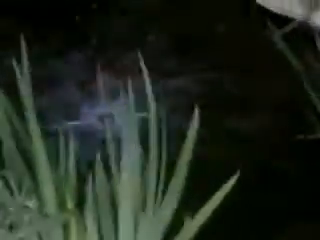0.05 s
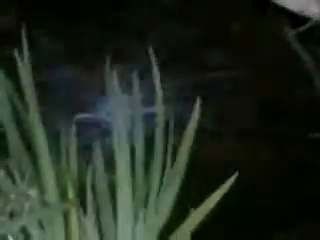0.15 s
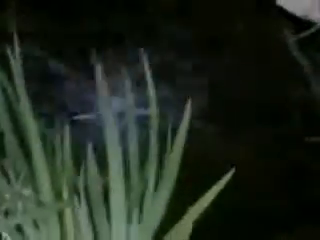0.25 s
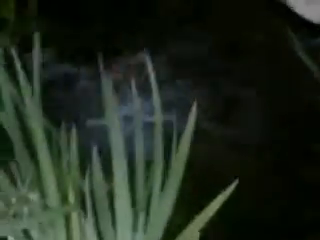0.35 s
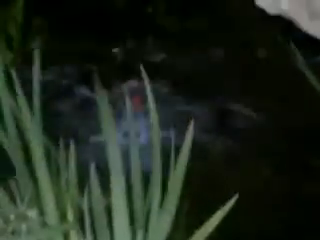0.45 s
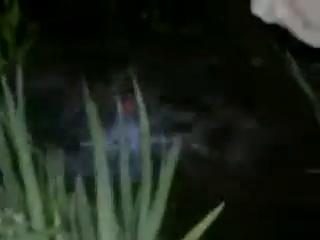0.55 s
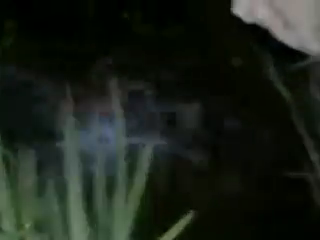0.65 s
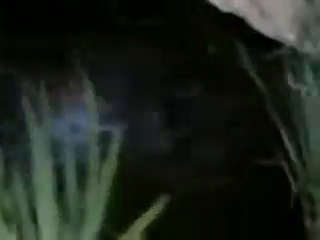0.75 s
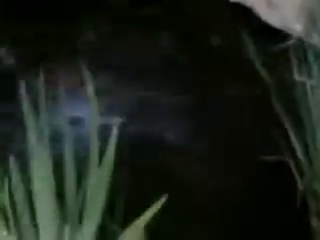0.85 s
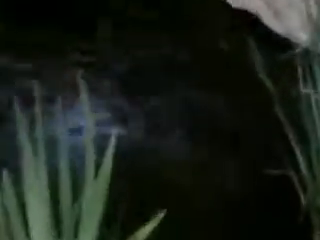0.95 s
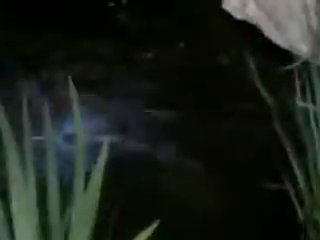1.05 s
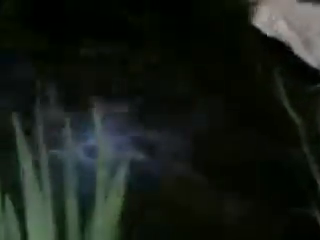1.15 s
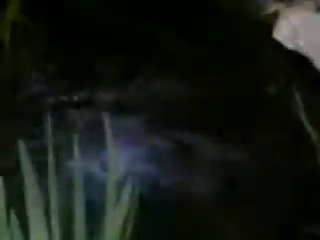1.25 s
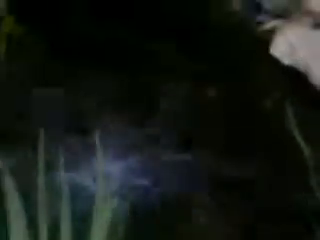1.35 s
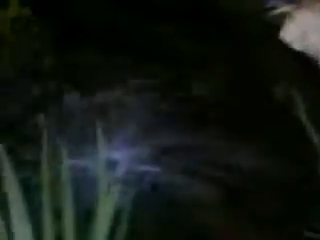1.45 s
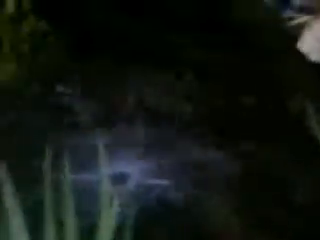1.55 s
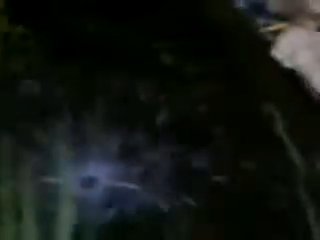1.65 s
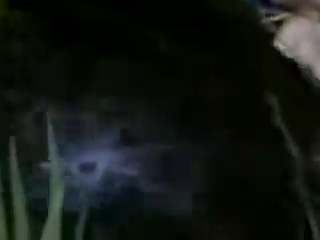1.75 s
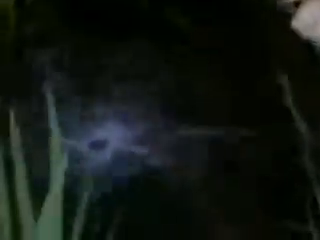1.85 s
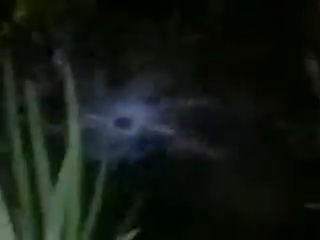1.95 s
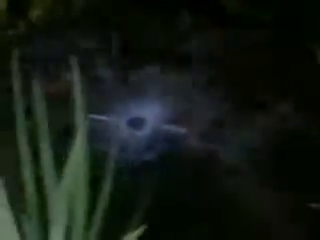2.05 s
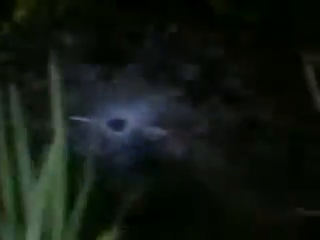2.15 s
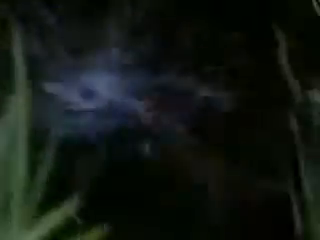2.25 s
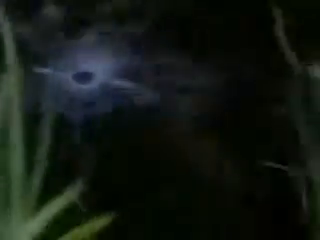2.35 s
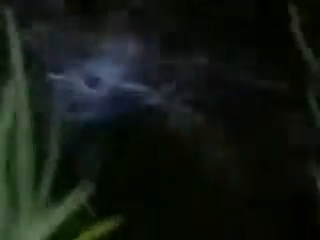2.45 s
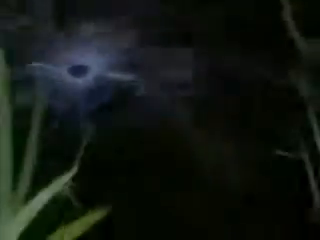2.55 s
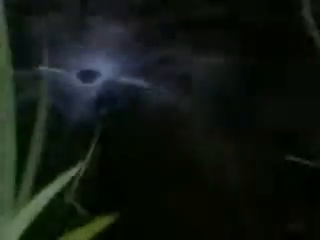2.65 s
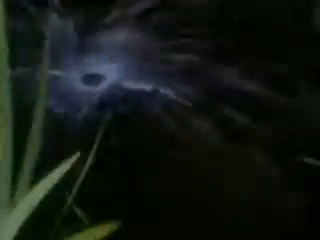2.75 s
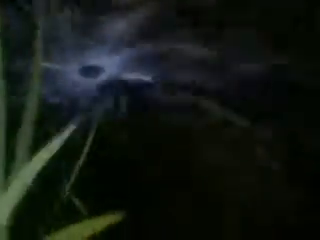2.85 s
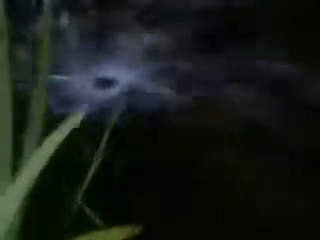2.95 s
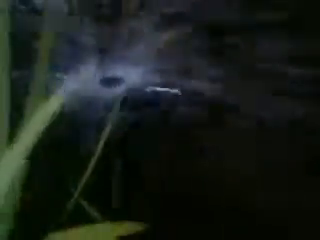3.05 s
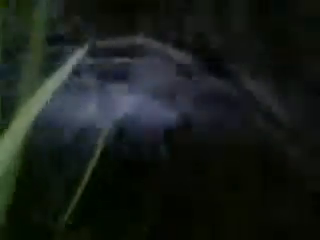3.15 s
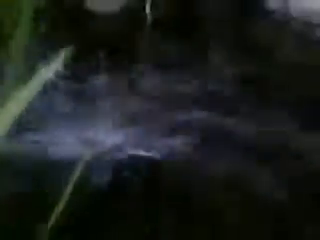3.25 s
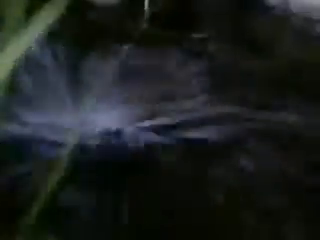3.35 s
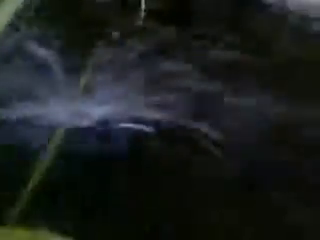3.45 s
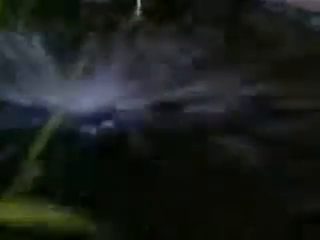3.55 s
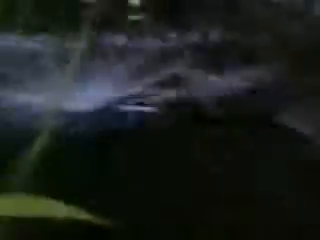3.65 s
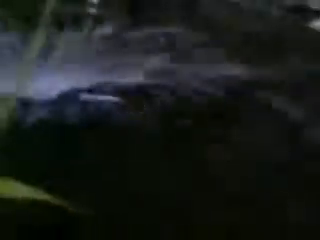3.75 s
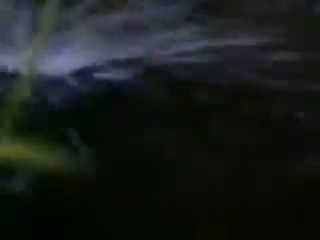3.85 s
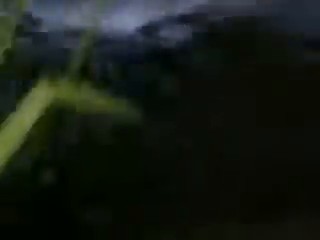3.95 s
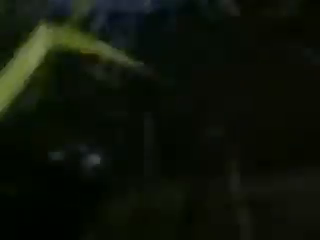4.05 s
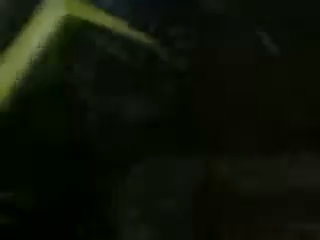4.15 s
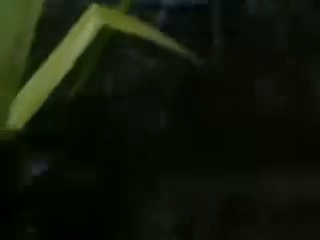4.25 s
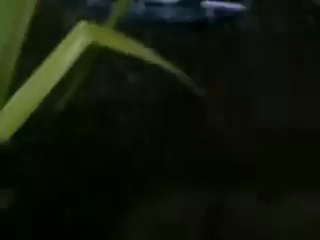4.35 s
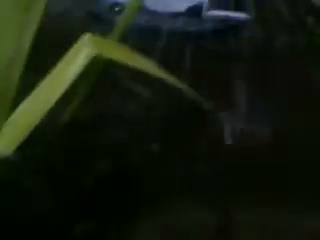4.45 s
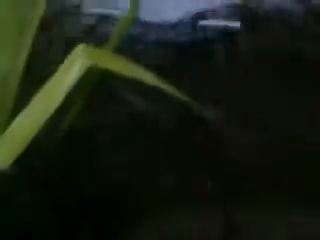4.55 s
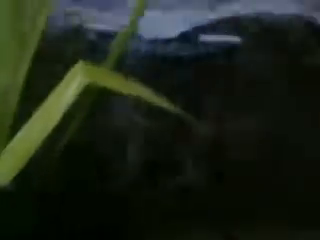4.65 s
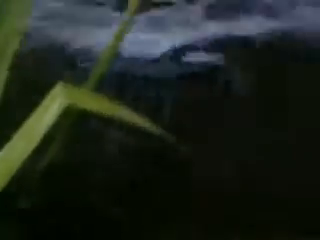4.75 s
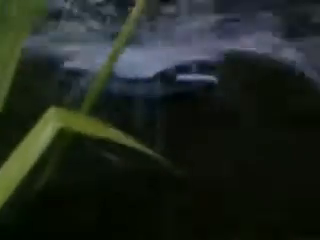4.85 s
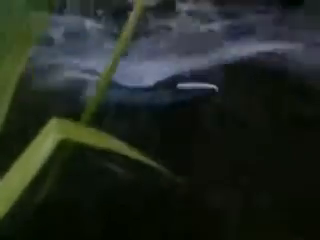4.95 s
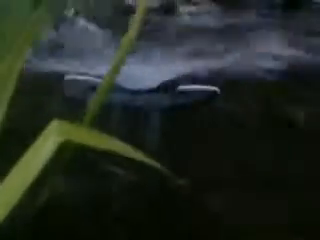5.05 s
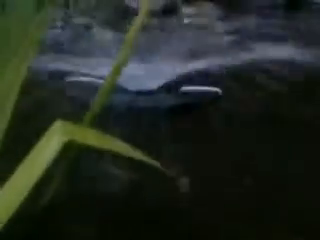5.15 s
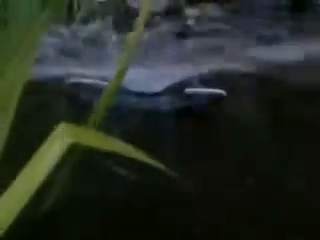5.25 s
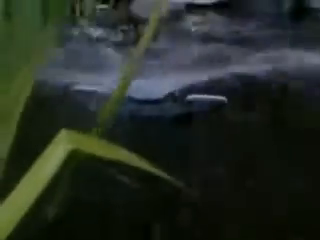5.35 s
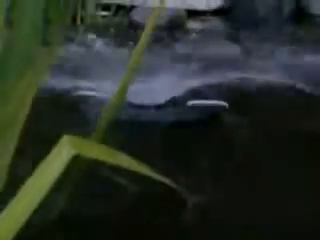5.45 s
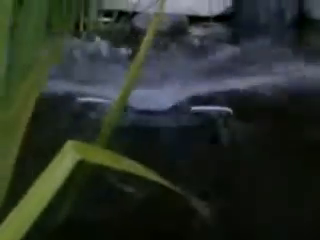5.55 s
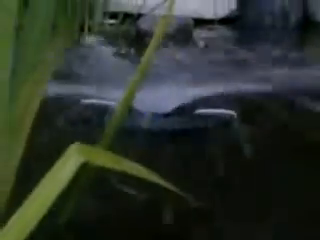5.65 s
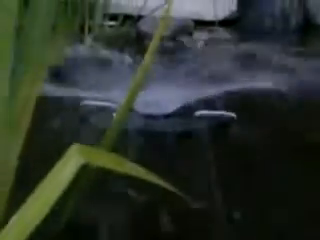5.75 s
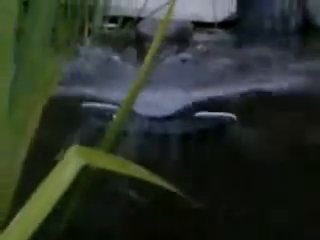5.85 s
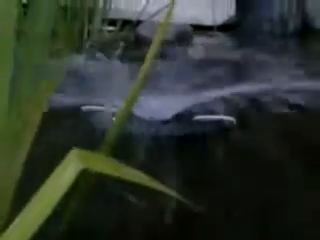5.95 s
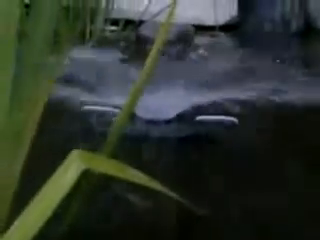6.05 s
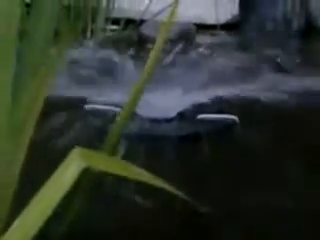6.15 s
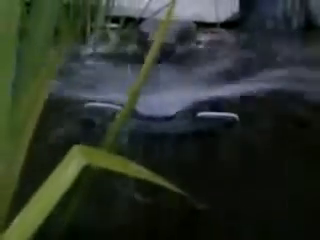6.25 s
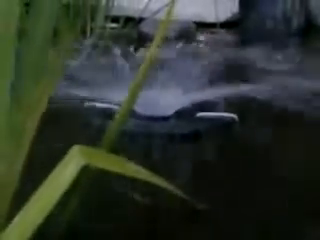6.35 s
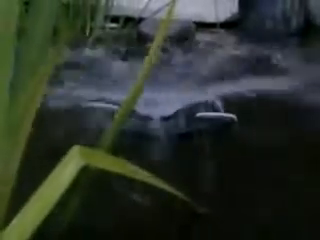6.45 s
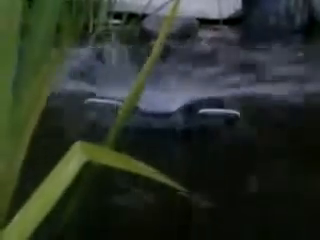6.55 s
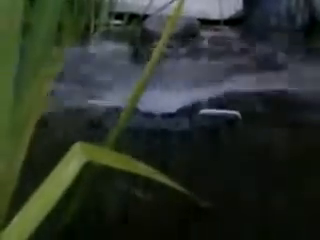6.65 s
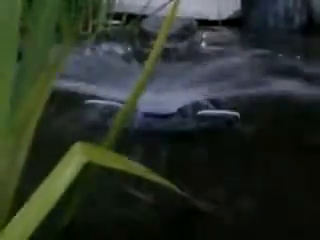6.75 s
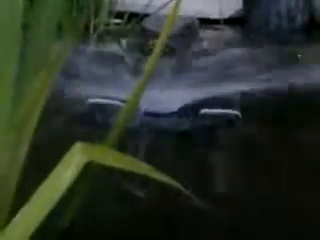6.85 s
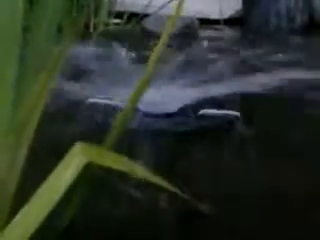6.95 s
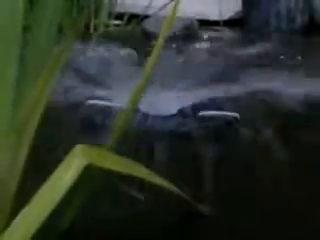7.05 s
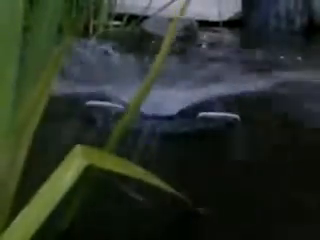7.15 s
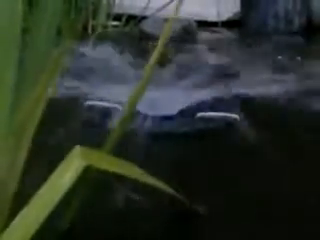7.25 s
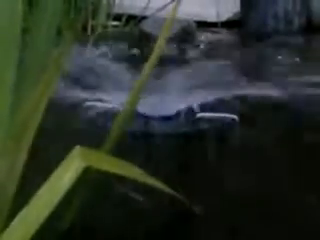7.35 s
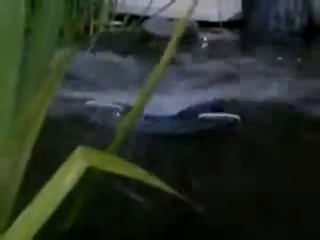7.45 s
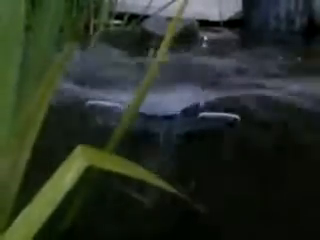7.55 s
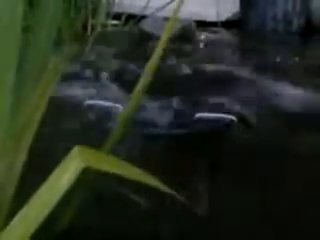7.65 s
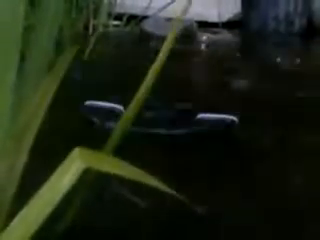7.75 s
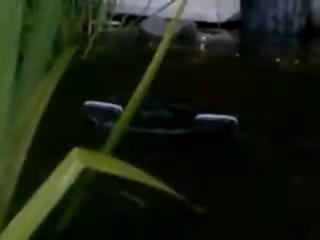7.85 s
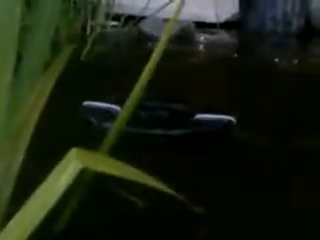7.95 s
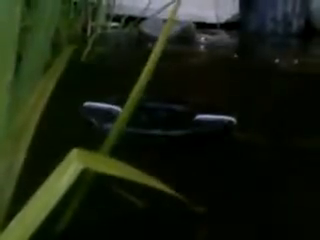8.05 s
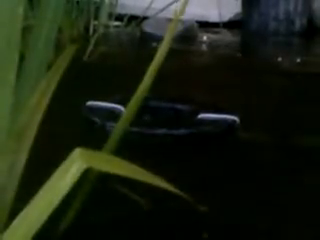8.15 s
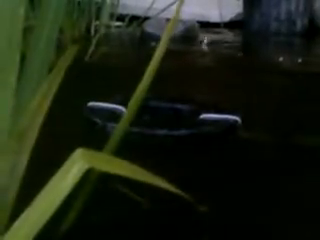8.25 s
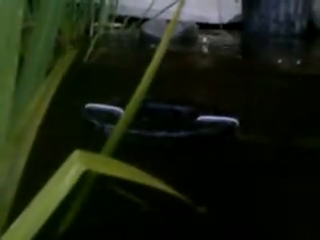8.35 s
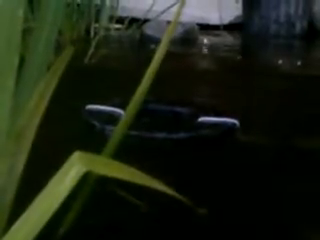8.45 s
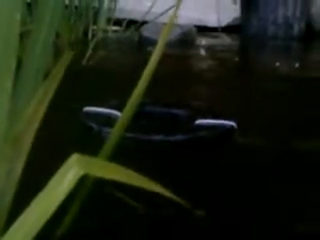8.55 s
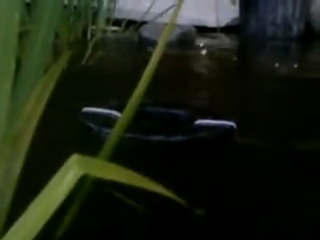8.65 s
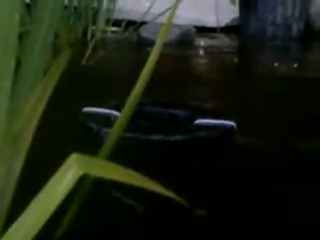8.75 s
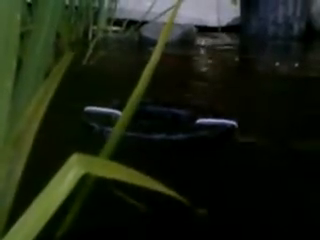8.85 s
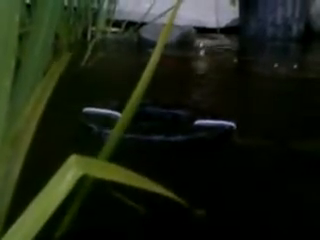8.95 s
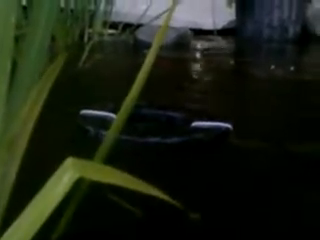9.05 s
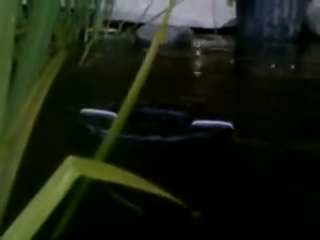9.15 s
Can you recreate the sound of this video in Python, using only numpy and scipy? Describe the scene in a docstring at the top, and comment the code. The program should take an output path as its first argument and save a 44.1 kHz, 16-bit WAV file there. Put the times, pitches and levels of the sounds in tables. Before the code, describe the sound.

Water sprays steadily from a floating fountain as wind thumps the microphone, until the pump cuts out and the last drops fall.

```python
"""A small floating pump flings a disc of spray over a garden pond while wind buffets the microphone.
Single drops splat and drip. The listener stoops from above the reeds to the water line, which changes
the balance of the resonances in the float's drone. The pump gulps air and stops at 7.65 s; the last
drops fall and water trickles off the float in ringing bubbles. A bird trills far off, and a soft band
of noise swells at the end."""
import sys
import numpy as np
from scipy import signal
from scipy.fft import rfft, irfft
from scipy.io import wavfile
from scipy.ndimage import map_coordinates

SR = 44100
rng = np.random.default_rng(int(sys.argv[2]) if len(sys.argv) > 2 else 0)


def master_out(mix):
    """Clip the mix to full scale and print it as 16-bit PCM to the path in sys.argv[1]."""
    frames = np.transpose(np.atleast_2d(mix))
    ceiling = np.clip(frames, -1, 1)
    pcm = np.round(ceiling * 32767).astype(np.int16)
    wavfile.write(sys.argv[1], SR, pcm)


N = 405279


def amp(db):
    """Amplitude ratio of a level in dB."""
    return 10 ** (np.asarray(db) / 20)

def unit_rms(x):
    """Normalisation to unit power."""
    return x / np.sqrt(np.mean(x ** 2) + 1e-20)

def in_time(rows):
    """Linear interpolation of each column at every sample."""
    s, *columns = np.transpose(rows)
    return [np.interp(np.arange(N) / SR, s, c) for c in columns]

def hold(start, length, edge):
    """Trapezoidal envelope, at half height at its start and end."""
    t = np.arange(N) / SR
    return np.clip(np.minimum(t - start, start + length - t) / edge + .5, 0, 1)

def add(out, s, sound):
    """Superposition of a short sound at time s."""
    i = round(s * SR)
    out[i:i + len(sound)] += sound[:N - i]

def drift(hz):
    """Random modulation: low-passed noise of unit rms."""
    r = np.exp(-80 * np.pi * hz / SR)
    slow = signal.lfilter([1], [1, -2 * r, r * r], rng.standard_normal(N // 40 + 2002))[2000:]
    return np.interp(np.arange(N) / 40, np.arange(len(slow)), unit_rms(slow))

def colour(x, spectrum):
    """Minimum-phase filter, from the folded cepstrum of a spectrum table."""
    size = 8192
    hz, level_db = np.transpose(spectrum)
    grid = np.maximum(np.fft.rfftfreq(size, 1 / SR), 1)
    cepstrum = irfft(np.interp(np.log(grid), np.log(hz), level_db) * np.log(10) / 20)
    cepstrum[1:size // 2] *= 2
    cepstrum[size // 2 + 1:] = 0
    return signal.fftconvolve(x, irfft(np.exp(rfft(cepstrum))))[:N]

def resonance(x, hz, width_hz):
    """Damped second-order resonator of unit peak gain."""
    r = np.exp(-np.pi * width_hz / SR)
    gain = (1 - r * r) / 2
    return signal.lfilter([gain, 0, -gain], [1, -2 * r * np.cos(2 * np.pi * hz / SR), r * r], x)


def droplets(per_s, spread_db, mist):
    """Shot noise: random impacts of uneven size over a Gaussian mist."""
    sizes = amp(spread_db * np.minimum(rng.exponential(1, N), 6)) * rng.choice([-1, 1], N)
    return unit_rms(sizes * (rng.random(N) < per_s / SR)) + mist * rng.standard_normal(N)

def bubbles(per_s, pitches_hz, q, spread_db, max_spreads):
    """Bubble resonance: pockets of air, trapped at random, each ring briefly at one of the pitches."""
    sizes = amp(spread_db * np.minimum(rng.exponential(1, N), max_spreads))
    kicks = sizes * (rng.random(N) < per_s / SR)
    choice = rng.integers(0, len(pitches_hz), N)
    rings = (resonance(kicks * (choice == k) + 1e-18, hz, hz / q) for k, hz in enumerate(pitches_hz))
    return unit_rms(sum(rings))

def splashes(per_s, t60):
    """Exponential relaxation: an envelope jumps as each larger blob lands, then decays."""
    jumps = rng.exponential(1, N) * (rng.random(N) < per_s / SR)
    return signal.lfilter([1], [1, -amp(-60 / (t60 * SR))], jumps + 1e-18)

# Course of the spray: t/s, level/dB, tilt of the lower hiss/dB
SPRAY_LEVELS = [(0, -28.5, 3.5), (.46, -28, 2.5), (.9, -25.5, -3), (1.33, -24.5, -1.5), (1.75, -25.5, -1),
                (2.9, -24, -2), (3.22, -23.5, -5), (3.68, -27.5, 0.5), (4.5, -28, 1), (6.5, -28, 1.5),
                (7.22, -27.5, -0.5), (7.6, -28, -0.5), (7.65, -31, 1), (7.68, -35, 4.5), (7.735, -40, 6.5),
                (7.78, -36.5, 3), (7.885, -38.5, 3), (7.91, -44.5, 2), (8.05, -45.5, 0), (8.6, -49.5, 7),
                (9.19, -48.5, 0)]
# Spectrum of the spray: f/Hz, density level/dB
SPRAY_SPECTRUM = [(250, -29), (400, -36), (900, -21), (2000, -18.5), (3800, -16), (4300, -14), (5400, -14),
                  (6500, -11.5), (7800, -6), (9400, -1.5), (10200, -5), (10700, -8), (12200, -15),
                  (15700, -21)]
def spray(surge_db, patchy_db):
    """Incoherent summation: impacts and bubbles merge in a hiss that surges as a whole and by band."""
    level_db, tilt_db = in_time(SPRAY_LEVELS)
    impacts = droplets(per_s=9000, spread_db=1.5, mist=1.74)
    ringing = bubbles(1500, np.geomspace(1500, 15000, 40), q=36, spread_db=6.9, max_spreads=5)
    rest = unit_rms(colour(impacts + .37 * ringing, SPRAY_SPECTRUM))
    envelope = amp(level_db + surge_db * drift(27))
    hiss = 0
    for hz in np.geomspace(900, 12500, 9):   # peel off bands from the bottom
        band = signal.sosfiltfilt(signal.butter(2, hz, fs=SR, output="sos"), rest)
        rest = rest - band
        lowness = np.clip(np.log2(7500 / hz), 0, 1)
        gain = amp(lowness * tilt_db + patchy_db * drift(1.9))
        hiss += band * gain * (1 + .097 * splashes(per_s=60, t60=.046))
    hiss += rest * amp(.2 * np.minimum(level_db + 42, 0))   # the last drops lack the finest mist
    return envelope * hiss * (1 + .015 * splashes(per_s=44, t60=.0075))

# Two near reflections that sweep as the listener moves: t/s, first lag/ms, second lag/ms, strength/1
NEAR_ECHOES = [(0, .41, .76, .7), (.25, .465, .73, .7), (.55, .47, .725, .6), (.8, .46, .72, 1),
               (1.0, .44, .68, .9), (1.25, .41, .62, .8), (1.55, .47, .7, .6), (1.75, .43, .5, .5),
               (2.1, .36, .5, .7), (2.45, .36, .55, .5), (2.9, .4, .6, 0), (9.19, .4, .6, 0)]
def reflections(x, bank_gain):
    """Comb filtering: echoes off small things nearby, stones and banks interfere with the direct hiss."""
    lag1_ms, lag2_ms, strength = in_time(NEAR_ECHOES)
    n = np.arange(N)
    treble = signal.butter(2, [3800, 11000], "band", fs=SR, output="sos")
    scattered = strength * signal.sosfiltfilt(treble, x)
    out = x.copy()
    for gain, lag_ms in ((.3, lag1_ms), (-.32, lag2_ms)):
        out += gain * map_coordinates(scattered, [n - lag_ms * SR / 1000], order=3)
    for bank_ms in (1.35, 2.4, 3.9, 6.1):
        lag_ms = bank_ms + .076 * drift(.64)
        out += bank_gain * np.interp(n - lag_ms * SR / 1000, n, x)
    return out

# Course of the drone: t/s, level/dB, stoop/1 (0 above, 1 at the water line)
DRONE = [(0, -46, 0.73), (.6, -37.5, 0.089), (1.7, -36, 0), (2.2, -36.5, 0.36), (2.6, -36.5, 0.21),
         (3, -33.5, 0.29), (3.3, -39, 0.81), (3.7, -35, 0.52), (4.25, -38, 0.88), (5, -38.5, 0.93),
         (7, -38.5, 0.88), (7.45, -35, 0.8), (9.19, -35, 1)]
# Modes of the float: f/Hz, nominal width/Hz, gain from above/dB, gain at the water line/dB
FLOAT_MODES = [(518, 112, -21, -2.5), (770, 57, -18.5, -8.5), (1102, 296, -15, -7.5), (1240, 114, -17, 3.5),
               (1425, 33, -12, -6), (1584, 276, -11.5, 0), (1961, 190, -12.5, -4), (2194, 79, -7.5, -9),
               (2484, 200, -9.5, -10.5), (2780, 120, -30, -4.5), (2935, 60, -55, 4)]
STOP_S = 7.65
def pump(waver_db, gulps_s, run_down_db_per_s):
    """Forced vibration: impeller slap and turbulence drive the float's modes until the pump runs down."""
    drone_db, stoop = in_time(DRONE)
    t = np.arange(N) / SR
    drone_db -= 7 * sum(np.exp(-((t - s) / .0092) ** 2) for s in gulps_s)   # the impeller draws air
    drone_db -= 15 * hold(STOP_S, np.inf, .0079) + run_down_db_per_s * np.maximum(t - STOP_S, 0)
    shake = droplets(per_s=3000, spread_db=3, mist=.98)
    modes = 0
    for k, (hz, width_hz, above_db, waterline_db) in enumerate(FLOAT_MODES):
        ring = resonance(resonance(shake, hz, 1.32 * width_hz), hz, 1.32 * width_hz)
        heard_db = above_db + stoop * (waterline_db - above_db)
        modes += (-1) ** k * amp(heard_db + waver_db * drift(17.4)) * ring
    return amp(drone_db + .4 * drift(22)) * unit_rms(modes)

# Hollow gliding band in the drone: t/s, f/Hz, level/dB
HOLLOW_SWEEP = [(0, 1342, -43), (1.5, 1320, -41), (2.45, 1202, -53), (2.6, 1400, -46), (2.9, 1318, -39),
                (3.35, 1240, -44.5), (3.5, 1440, -48), (3.8, 1360, -39.5), (4.3, 1223, -56),
                (4.5, 1230, -90), (9.19, 1230, -90)]
def hollow_sweep(width_hz):
    """Narrow-band noise: a hollow band in the drone sweeps near 1.3 kHz as the listener moves."""
    hz, level_db = in_time(HOLLOW_SWEEP)
    phase = 2 * np.pi * np.cumsum(hz) / SR
    lowpass = signal.butter(2, width_hz / 2, fs=SR, output="sos")
    slow = signal.sosfilt(lowpass, rng.standard_normal((2, N)))
    return amp(level_db) * unit_rms(slow[0] * np.cos(phase) + slow[1] * np.sin(phase))

# Spectrum of the wind's rumble: f/Hz, density level/dB
WIND_SPECTRUM = [(11, 11), (18, 8.5), (108, 4), (193, -13), (232, -11.5), (297, -23), (601, -27.5),
                 (700, -43), (910, -63), (1540, -120)]
# Gusts: t/s, duration/s, level/dB
WIND_GUSTS = [(0, 0.36, -27.5), (0.437, 0.62, -37.5), (1.437, 0.27, -47), (2.314, 0.88, -36.5),
              (3.453, 0.71, -45), (5.43, 0.23, -44), (5.964, 0.596, -31), (6.77, 0.61, -41.5),
              (7.447, 0.72, -41.5), (8.35, 0.45, -46)]
# Single buffets: t/s, nominal level/dB, nominal f/Hz
WIND_BUFFETS = [(0.095, -23, 113), (.108, -21, 90), (.143, -12, 110), (.147, -21, 333), (.152, -8, 102),
                (.184, -22.5, 135), (.262, -16.5, 140), (.271, -19, 302), (.555, -25, 99), (.752, -26, 60),
                (.865, -26, 60.6), (1.065, -27, 76), (1.755, -31.5, 50.4), (2.345, -26, 67),
                (2.392, -19.5, 129), (2.591, -25.5, 119), (2.63, -25, 80.5), (3.06, -21, 100),
                (3.114, -22, 131), (3.724, -32, 81), (4.06, -31, 65), (5.455, -30, 118), (5.969, -9.5, 165),
                (6.016, -30, 110), (6.085, -20.5, 70), (6.122, -20, 131), (6.182, -23.5, 108),
                (6.253, -16.5, 142), (6.343, -18.5, 101), (6.445, -21.5, 140), (6.54, -25, 79.6),
                (7.012, -26.5, 60.3), (7.462, -23, 89.5), (7.545, -25.5, 78), (7.677, -23.5, 130),
                (7.719, -20.5, 92.5), (7.823, -27.5, 110), (8.035, -42, 50), (8.135, -37, 65),
                (8.445, -32.5, 83), (8.775, -34, 60)]
def wind(calm_db, lumpy_db, puff_db, puff_cycles):
    """Turbulent pressure at the microphone: gusts rumble; each buffet sucks, then pushes, in a puff."""
    gusts = amp(calm_db) + sum(amp(db) * hold(s, length, edge=.12) for s, length, db in WIND_GUSTS)
    envelope = gusts * amp(lumpy_db * drift(12))
    pulses = np.zeros(N)
    for s, db, hz in WIND_BUFFETS:
        cycles = hz * np.arange(int(4 * SR / hz)) / SR
        shape = 2.1 * cycles * np.exp(1 - 2.96 * cycles ** 2.5)
        add(pulses, s, -amp(db) * shape * np.sin(2 * np.pi * cycles ** .78))
        puff = np.sin(np.pi * np.minimum(cycles / puff_cycles, 1))
        add(envelope, max(s - 1 / hz, 0), amp(db + puff_db) * puff)
    return pulses + envelope * unit_rms(colour(rng.standard_normal(N), WIND_SPECTRUM))

# Spectrum of the garden: f/Hz, density level/dB
GARDEN_SPECTRUM = [(88, -19), (150, 3.5), (389, -5), (482, -6), (633, -8.5), (1950, -16.5), (2200, -19),
                   (3640, -15), (4600, -24), (9260, -22.5), (15700, -22.5)]
def garden(level_db):
    """Ambient noise: far hum and leaves form a nearly steady broadband floor."""
    envelope = amp(level_db + .44 * drift(12))
    return envelope * unit_rms(colour(rng.standard_normal(N), GARDEN_SPECTRUM))

# Drops bursting on a leaf or the case: t/s, relative fizz level/dB, fizz t60/s, tick level/dB, f/Hz
DROP_IMPACTS = [(.72, -20, .015, -15, 10800), (.8874, -14, .012, -6, 12000), (1.9495, -18, .02, -34, 4000),
                (2.0862, -16, .03, -34, 5000), (2.115, -30, .01, -12, 3300), (2.5641, -18, .02, -34, 5000),
                (3.0629, -14, .02, -30, 5000), (3.2642, -5, .008, -12, 4000), (3.3074, -16, .01, -18, 2700),
                (4.9053, -17, .02, -26, 4000), (4.965, -20, .02, -26, 5000), (5.88, -22, .02, -26, 3500),
                (6.5805, -30, .01, -18, 5500), (6.5835, -19, .03, -12, 3600), (7.0823, -18, .02, -34, 5000),
                (7.3033, -11, .03, -30, 7000), (7.4749, -20, .02, -34, 5000), (7.695, -26, .05, -31, 5500),
                (7.7593, -25, .03, -32, 5000), (7.79, -32, .02, -33, 3500), (7.8171, -24, .04, -34, 5500),
                (7.87, -27, .02, -36, 11000), (8.15, -36, .05, -42, 5500), (8.4612, -36, .02, -46, 6000),
                (8.9635, -27, .07, -36, 9500), (9.1072, -38, .02, -40, 5500), (9.1262, -23, .08, -38, 7500)]
def splats(overtone_ratio):
    """Impact transients: a tick of two heavily damped partials, and a dying fizz of bright noise."""
    ticks, fizz = np.zeros((2, N))
    t = np.arange(SR // 10) / SR
    for s, fizz_db, t60, tick_db, tick_hz in DROP_IMPACTS:
        add(fizz, s, amp(fizz_db - 8.5 - 60 * t / t60))
        for hz, db in ((tick_hz, tick_db), (min(overtone_ratio * tick_hz, 15000), tick_db - 1)):
            add(ticks, s, amp(db) * np.exp(-.75 * hz * t) * np.sin(2 * np.pi * hz * t))
    bright = resonance(colour(rng.standard_normal(N), SPRAY_SPECTRUM), 8400, 5000)
    return ticks + fizz * unit_rms(bright)

# Drops that trap a bubble: t/s, level/dB, starting f/Hz, t60/s
DRIP_BUBBLES = [(2.893, -28, 2900, .015), (3.264, -24, 520, .022), (3.2645, -21, 1250, .02),
                (3.284, -21, 800, .025), (3.289, -27, 1150, .025), (7.762, -33, 3900, .02),
                (7.824, -34, 2300, .05), (7.836, -39, 3900, .02), (7.985, -44, 2250, .03),
                (8.345, -43, 1600, .04), (8.47, -46, 1650, .03), (9.041, -42, 3000, .02),
                (8.7335, -31, 2800, .035), (9.088, -33, 990, .06)]
def drips():
    """Damped free oscillation: a bubble's pitch climbs as it nears the surface."""
    out, t = np.zeros(N), np.arange(SR // 10) / SR
    for s, db, hz, t60 in DRIP_BUBBLES:
        phase = 2 * np.pi * hz * (t + 2.8 * t ** 2)
        attack = np.minimum(t * hz, 1)
        add(out, s, amp(db - 60 * t / t60) * attack * np.sin(phase))
    return out * (1 + .15 * drift(150))   # ripples shake the level

def trickle(per_s, level_db):
    """Air entrainment: water running off the float makes small bubbles once the pump stops."""
    rings = bubbles(per_s, np.geomspace(1250, 1980, 10), q=15, spread_db=4.1, max_spreads=4)
    return amp(level_db) * hold(STOP_S, np.inf, .05) * rings

def bird(start_s, length_s, notes_per_s, top_hz, fall_hz):
    """Frequency modulation: a growing trill of falling notes, husky with distance, echoing off leaves."""
    t = np.arange(N) / SR - start_s
    note_progress = (notes_per_s * (t + .005) + .06 * drift(4)) % 1
    hz = top_hz + 52 * drift(12) - fall_hz * np.clip(2.1 * note_progress - .4, 0, 1)
    envelope = np.sin(np.pi * note_progress) * (1 + .5 * drift(60))
    notes = envelope * np.sin(2 * np.pi * np.cumsum(hz) / SR)
    lag_s = np.arange(SR // 4) / SR
    echoes = .045 * rng.standard_normal(len(lag_s)) * amp(-60 * lag_s / .3)
    blurred = unit_rms(notes + signal.fftconvolve(notes, echoes)[:N])
    return amp(-56.5 + 2.5 * t) * blurred * hold(start_s, length_s, edge=.03)

def swell(start_s, rise_s, level_db):
    """Resonant filtering: two mid-register bands of noise rise and hold."""
    white = rng.standard_normal(N)
    bands = unit_rms(resonance(white, 1780, 300) + .5 * resonance(white, 3100, 300))
    return amp(level_db) * hold(start_s + rise_s / 2, np.inf, rise_s) * bands

# Faint side signal: f/Hz, side level relative to mid/dB
SIDE_SPECTRUM = [(60, -63), (110, -79), (200, -51), (380, -39.5), (700, -53), (1290, -63), (2380, -17),
                 (4400, -37), (8120, -94), (15000, -31)]
def scene():
    """Mid-side stereo: a delayed, filtered copy of the mix, strongest near 2.4 kHz, makes the two channels
    differ faintly."""
    mid = reflections(spray(surge_db=.5, patchy_db=-.42), bank_gain=.14)
    mid += pump(waver_db=2.1, gulps_s=(7.525, 7.605), run_down_db_per_s=35)
    mid += hollow_sweep(width_hz=184)
    mid += wind(calm_db=-46, lumpy_db=3, puff_db=-6, puff_cycles=2.93)
    mid += garden(level_db=-46)
    mid += splats(overtone_ratio=2.3)
    mid += drips()
    mid += trickle(per_s=70, level_db=-60)
    mid += bird(start_s=8.05, length_s=.84, notes_per_s=16.9, top_hz=3930, fall_hz=400)
    mid += swell(start_s=8.86, rise_s=.26, level_db=-49)
    side = colour(np.roll(mid, 900), SIDE_SPECTRUM)
    return np.array([mid + side, mid - side])

def record(dry):
    """Band limiting: an elliptic low-pass cuts steeply above 15720 Hz."""
    return signal.sosfilt(signal.ellip(14, .2, 65, 15720, fs=SR, output="sos"), dry)


dry = scene()
out = record(dry)
master_out(out)
```